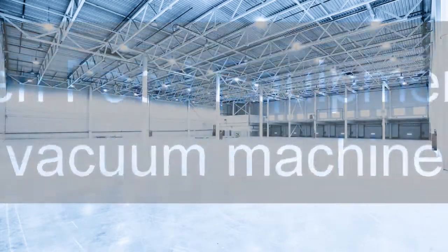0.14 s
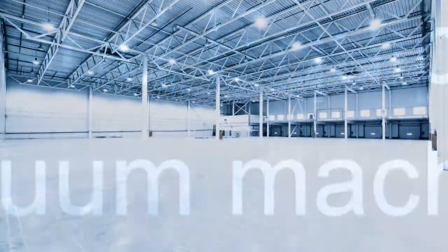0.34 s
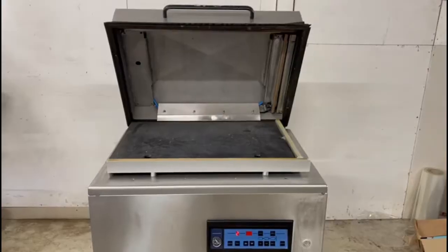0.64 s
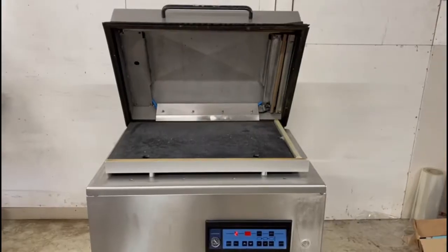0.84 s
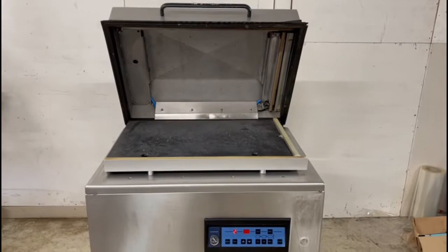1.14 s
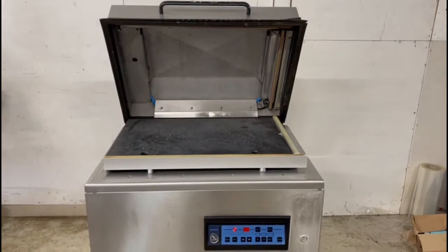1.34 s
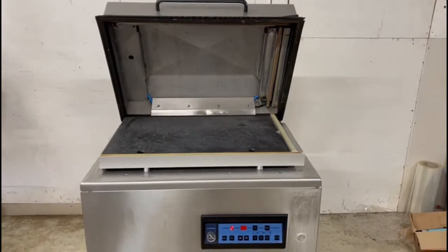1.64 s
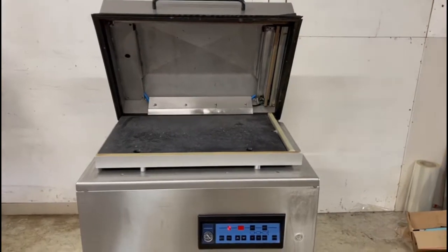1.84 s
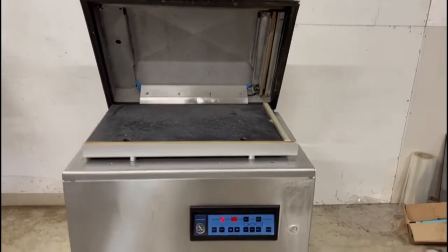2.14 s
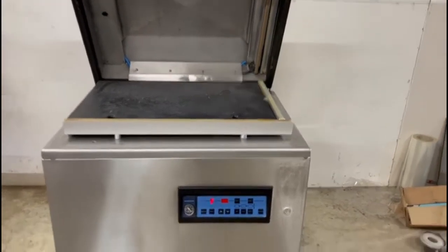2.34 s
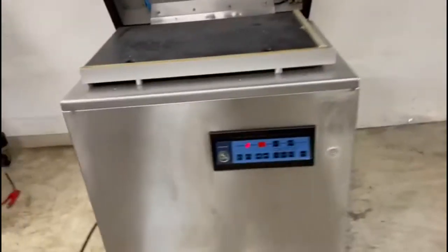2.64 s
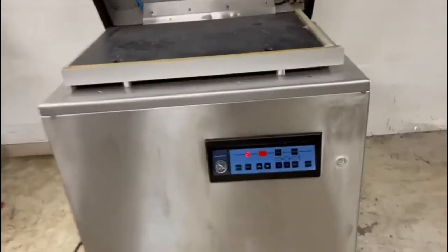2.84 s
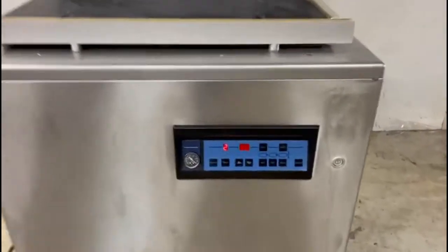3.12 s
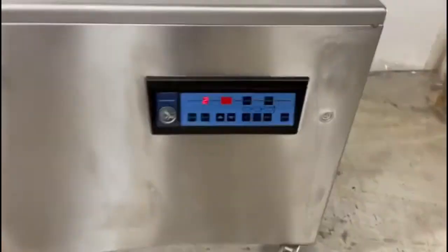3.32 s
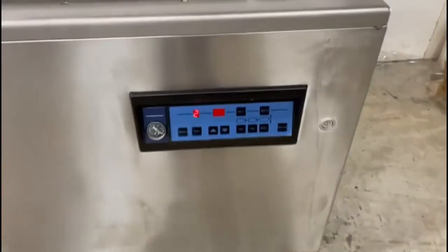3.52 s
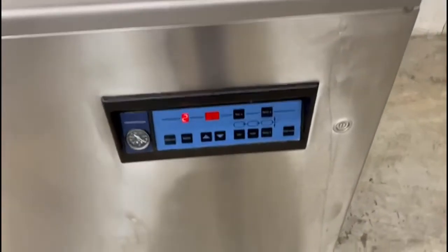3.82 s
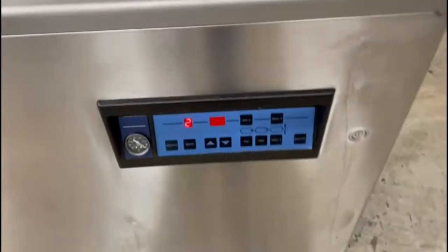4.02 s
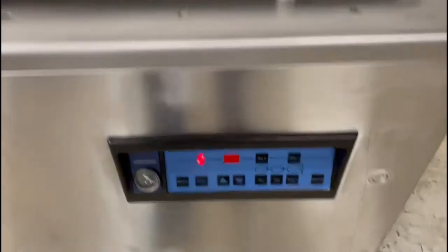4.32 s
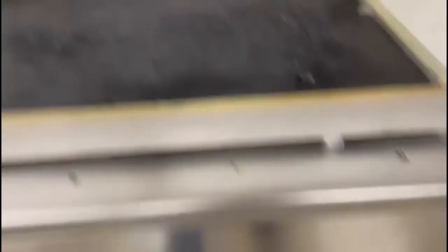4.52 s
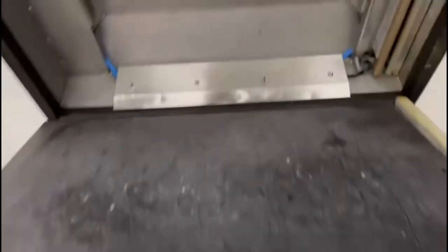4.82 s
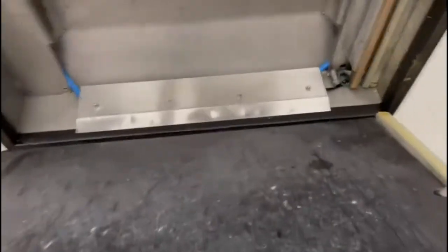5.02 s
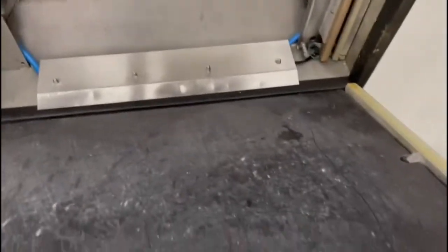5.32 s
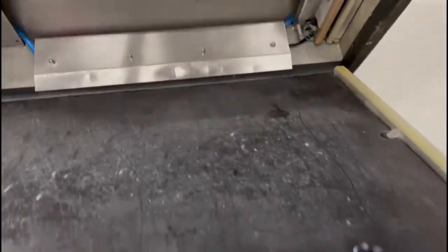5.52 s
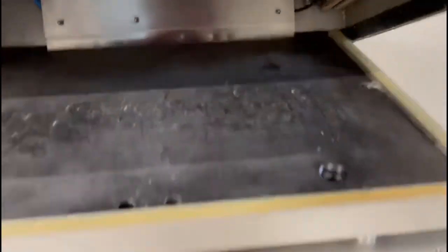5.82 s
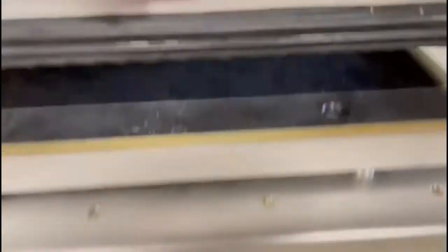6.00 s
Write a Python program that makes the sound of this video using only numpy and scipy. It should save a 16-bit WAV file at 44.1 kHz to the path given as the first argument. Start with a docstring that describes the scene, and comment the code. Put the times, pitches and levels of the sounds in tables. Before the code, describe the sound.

After a moment of silence, a packing machine's vacuum pump is suddenly running, heard from under two metres in a hall with hard walls. Its even mechanical hum carries a wavering whine and an airy rush that rings the steel cabinet. Halfway through, quiet footsteps and scuffs accompany the hand-held microphone as it comes nearer, shifting the hum's tone. A short knock on the lid and some soft thuds come late, over the continuing drone.

```python
"""A three-vane rotary vacuum pump in a packing machine's steel cabinet, in a hard-walled hall.
It cuts in at full speed, 1.75 m from a hand-held microphone pair: the vanes drone, the motor whines,
rushing air rings the cabinet. At 1.7 s the hum slips once. From 3 s soft steps and scuffs go with the
pair up to the front panel, then over the open chamber, 1 m off, and the hum changes colour.
At 5.1 s a hand knocks the lid; the pair then turns back towards the panel."""
import sys
import numpy as np
from scipy import signal
from scipy.fft import rfft, irfft, next_fast_len
from scipy.io import wavfile
from scipy.ndimage import uniform_filter1d, map_coordinates

SR = 44100
rng = np.random.default_rng(int(sys.argv[2]) if len(sys.argv) > 2 else 0)


def wrap_up_sound(samples):
    """Save the sound to the file named by the first command line argument, as 16-bit audio."""
    columns = np.atleast_2d(samples).T
    # keep every value between -1 and 1, then stretch to whole-number steps
    tamed = np.clip(columns, -1, 1)
    steps = np.round(tamed * 32767).astype(np.int16)
    wavfile.write(sys.argv[1], SR, steps)


N = 271611

START_S, TOP_HZ = .4806, 11760
SHAFT_HZ, MOTOR_HZ, BEARING_HZ, MAINS_HZ = 24.0, 24.372, 188.27, 100
SLIP_AT_S, SLIP_S = 1.68, .0184

# Path of the microphones; place 0 is far off, 1 at the front panel, 2 over the chamber:
# (time [s], distance [m], place [0-2], rush gain [dB], hiss gain [dB])
MIC_PATH = [(.5, 1.75, 0.084, 0.04, 0), (1.4, 1.63, 0.09, 0, 0), (2.2, 1.67, 0.65, 0, 0.12),
            (2.7, 1.77, 0.21, 0.55, 0.86), (3.3, 1.34, 1, 0.94, 0.96), (4.0, 0.996, 1.07, 1, 1.56),
            (4.4, 0.99, 0.73, 0.03, 0.68), (4.8, 0.97, 1.7, 0.76, 1.3), (5.4, 1, 1.74, 0.97, 1.05),
            (6.16, 0.92, 1.23, 1, 1.6)]
# Width as heard: (frequency [Hz], side over mid [dB], side in step [ratio], side in quadrature [ratio])
STEREO_IMAGE = [(60, -51, 0, 0), (205, -23, 0, .2), (265, -10, -.1, 0), (340, -12, -.1, 0),
                (457, -8.5, 0.03, .1), (800, -4.5, 0.13, 0.38), (1560, -2, -0.18, 0.1),
                (2310, -6.5, 0.059, .2), (3000, -3.5, 0.36, .3), (3700, -11, .3, .2), (4700, -4, .3, .1),
                (5500, -10, .2, 0), (6350, -15, .1, -.2), (7090, 2.5, .1, -.4), (7465, 10.5, 0, -.3),
                (7900, 50.5, 0, 0), (8800, 31.5, 0, 0), (9240, 11, 0, .3), (9670, 5, 0, .6),
                (10250, -4, 0, .5), (10700, -55, 0, 0)]
# Broad rush of air and sliding vanes: (frequency [Hz], density [dB per Hz])
RUSH_SPECTRUM = [(15, -86), (30, -83), (60, -61.5), (90, -66.5), (125, -73), (250, -72.5), (460, -74),
                 (650, -72.5), (820, -70), (1000, -74), (1300, -73), (1600, -74), (1820, -79),
                 (2150, -78.5), (2500, -81), (2900, -81), (3300, -90), (4600, -89), (5400, -94.5),
                 (7500, -96), (12000, -100)]
# Part of the rush that is alike on every motor turn: (frequency [Hz], share [0-1])
RUSH_REPEATS = [(500, 0.05), (900, 0.44), (1600, 0.25), (2200, 0.52), (2800, 0.03), (3600, 0.05), (5000, 0)]
# Cabinet resonances: (frequency [Hz], width [Hz], far [dB], at panel [dB], over chamber [dB])
CABINET_MODES = [(181, 14.3, -59, -50.5, -62), (327.3, 84, -58.5, -58, -62.5), (417, 26.5, -65, -63, -56),
                 (539.4, 54, -60.5, -62.5, -60.5), (614.5, 26.4, -59, -58, -75), (700, 17, -60, -58, -61.5),
                 (938, 63, -65, -62, -76), (1020, 27, -69.5, -58.5, -72), (1077, 21, -66, -71.5, -58),
                 (1109.6, 17.7, -52.5, -64.5, -54), (1218, 17.4, -62.5, -59, -61),
                 (1328, 32, -68, -65, -73.5), (1495, 89, -71.5, -73, -76.5), (1615, 32, -77, -67, -85),
                 (1950, 91, -76.5, -75.5, -71.5), (2191, 104, -87, -76.5, -70), (2666, 64, -75.5, -79, -80),
                 (3130, 57, -82.5, -76, -96), (3417, 89, -84.5, -85, -89)]
# A reflection off the cabinet's edge, sinking as the pair rises: (time [s], centre [Hz], lift [dB])
EDGE_REFLECTION = [(4.3, 2500, 0), (4.38, 2380, 6), (4.43, 1650, 7), (4.52, 1500, 7), (4.6, 1220, 6.5),
                   (4.74, 1000, 0)]
# Soft steps and bumps: (time [s], level [dB], pitch [Hz], t60 [s])
FOOTSTEPS = [(3.018, -28, 152, 0.16), (3.479, -36, 110, .2), (4.002, -29, 120.4, 0.16),
             (5.364, -26, 151.4, 0.33), (5.479, -23.5, 167.5, 0.21), (5.542, -33, 260.6, 0.5),
             (5.902, -25.5, 320, 0.18), (6.119, -30.5, 130, 0.2)]
# Swells of noise: (time [s], level [dB], length [s], centre [Hz], width [octaves])
SCUFF_SWELLS = [(3.672, -44.5, .055, 3100, .75), (4.27, -49.5, .035, 4200, .55),
                (4.42, -42.5, .5, 952, .03), (5.111, -41, .03, 2500, .85), (5.53, -35.5, .06, 900, .4),
                (5.64, -48, .46, 2030, .018), (6.125, -44, .05, 3000, .8)]
# A hand meets the lid: (time [s], level [dB], hardness [dB per octave])
HAND_CONTACTS = [(5.103, -24, -8), (5.112, -37, 4.5), (5.126, -29, -2)]
# The lid's ring: (frequency [Hz], level [dB], t60 [s])
LID_MODES = [(355, 0, .11), (430, -1, .1), (500, -5, .07), (1077, -7, .06), (1500, -11, .04),
             (2223, -9, .05), (2800, -18, .03), (3451, -16.5, .11), (4161, -22, .03), (4750, -15, .03),
             (6200, -30, .03)]
# A thin tone, perhaps a bearing: (harmonic [number], level [dB])
BEARING_PARTIALS = [(1, -53), (8, -58), (9, -60)]
# Motor whine: (order [per turn, rounded in use], far [dB], at panel [dB], over chamber [dB])
MOTOR_ORDERS = [(38, -56.5, -57, -65.5), (42, -65, -56, -53), (46, -51, -56.5, -50), (49, -55, -59.5, -67),
                (50, -53, -58, -55), (53, -59, -66.5, -52), (60, -61, -59.5, -63), (61, -61.5, -59, -47),
                (79.7, -69.5, -57.5, -67), (87.4, -59, -62.5, -59), (89.2, -58.5, -63.5, -64),
                (91, -61, -62, -61)]
# Lesser rotor tones: (order [per turn, rounded in use], far [dB], at panel [dB], over chamber [dB])
ROTOR_ORDERS = [(6, -52, -51, -43), (9, -41.5, -39.5, -47.5), (16.1, -44, -43, -65),
                (18, -55, -58.5, -43.5), (27, -59, -57, -65), (32, -59, -54.5, -54), (36, -54, -49, -68),
                (39, -55.5, -58.5, -42), (40, -52, -53, -48.5), (42, -54.5, -59.5, -51),
                (45, -67, -52.5, -50)]
# The vane rate and the multiples that change most along the path: (order [per turn])
VANE_ORDERS = [3, 12, 15, 21, 24]
# Their direct sound: (time [s], order 3 [dB], order 12 [dB], order 15 [dB], order 21 [dB], order 24 [dB])
VANE_DIRECT = [(.5, -38, -31.5, -39.5, -62, -43.5), (1.1, -38.5, -30.5, -37, -51, -45.5),
               (1.6, -39, -32, -39.5, -57, -44), (2.3, -38, -31, -41, -47.5, -42.5),
               (2.7, -38, -28.5, -42, -43, -41.5), (2.95, -36.5, -31, -42, -44.5, -46),
               (3.15, -40.5, -33.5, -40, -38.5, -41.5), (3.35, -34.5, -31, -44, -54, -40),
               (3.72, -35, -30.5, -41, -58, -44), (3.9, -36, -29, -45, -62, -62),
               (4.35, -34.5, -28, -35, -51, -66), (4.55, -36.5, -33, -41.5, -50, -45),
               (4.8, -34.5, -44, -41.5, -51, -49), (5.3, -31, -48.5, -52, -48, -42),
               (5.7, -36, -43, -49, -50, -44), (6.15, -30, -36, -35.5, -66, -68)]
# Their return off the walls, a row for each order: (far [dB], at panel [dB], over chamber [dB])
VANE_WALLS = [(-48, -41, -52), (-47, -46, -31), (-51, -52, -42), (-58, -52, -50), (-43, -48, -30)]


def amp(db):
    return 10 ** (np.asarray(db) / 20)


def at_hz(rows, hz):
    """Each column after the frequency, read on a log axis."""
    knots, *cols = np.transpose(rows)
    return [np.interp(np.log(hz + 1), np.log(knots + 1), c) for c in cols]


def at_time(rows, t):
    """Each column after the time, read at the times t."""
    knots, *cols = np.transpose(rows)
    return [np.interp(t, knots, c) for c in cols]


def at_mic(levels_db, t):
    """Far, panel and chamber levels blended for where the microphones are."""
    return np.interp(at_time(MIC_PATH, t)[1], np.arange(3), levels_db)


def wobble(rate, t):
    """A smooth random curve, rate knots a second."""
    grid = np.arange(0, N / SR + .02, .005)
    knots = rng.standard_normal(int(N * rate / SR) + 8)
    return np.interp(t, grid, map_coordinates(knots, [grid * rate]))


def filtered(x, response):
    """x times a complex response of frequency."""
    size = next_fast_len(N + 8192)
    return irfft(rfft(x, size) * response(np.fft.rfftfreq(size, 1 / SR)), size)[..., :N]


def add(track, start_s, sound):
    part = track[..., round(start_s * SR):][..., :sound.shape[-1]]
    part += sound[..., :part.shape[-1]]


def stereo_gains(hz):
    """Mid and side gains: the hiss is in opposite phase left and right near 8 kHz, mono above 10.7 kHz."""
    side_db, in_step, quadrature = at_hz(STEREO_IMAGE, hz)
    angle = np.arctan(amp(side_db))
    tied = in_step + 1j * quadrature
    loose = np.sqrt(np.clip(1 - abs(tied) ** 2, 0, 1))
    return np.array([np.cos(angle), np.sin(angle) * tied, np.sin(angle) * loose])


def pump_time(t):
    """When the sound heard at t left the pump: travel time to the microphones, and the slip."""
    return t - at_time(MIC_PATH, t)[0] / 343 - SLIP_S * (t > SLIP_AT_S)


def tone(hz, db, t, waver_db, drift_rad, order=None, wall_db=None):
    """A partial in two rows: heard direct and, at another phase, off the walls."""
    offsets = rng.uniform(0, 2 * np.pi, (2, 1))
    if order is not None:  # vane strokes are drawn out: high orders fall out of step and throb little
        offsets[0] = -.095 * order ** 2
    phase = 2 * np.pi * hz * pump_time(t) + drift_rad * wobble(5, t) + offsets
    direct_db = db + waver_db * wobble(6, t)
    scattered_db = (db if wall_db is None else wall_db) + waver_db * wobble(4.08, t)
    return np.sqrt(2) * amp([direct_db, scattered_db]) * np.sin(phase)


def motor_scrape(t):
    """Noise that repeats with every motor turn; three patterns slowly trade places."""
    size = round(SR / MOTOR_HZ)
    angle = (pump_time(t) * MOTOR_HZ % 1 * size).astype(int)
    patterns = rng.standard_normal((3, 2, size))
    weights = np.array([wobble(1.595, t) for _ in patterns])
    weights /= np.sqrt((weights ** 2).sum(axis=0) + .058)
    return sum(w * p[:, angle] for w, p in zip(weights, patterns))


def air_rush(t):
    """Air noise through cabinet resonances that each swell by themselves; each turn of the rotor chops it
    slightly."""
    hz, frames, fresh = signal.stft(rng.standard_normal((2, N)), SR, nperseg=2048)
    hz = hz[:, None]
    scrape = signal.stft(motor_scrape(t), SR, nperseg=2048)[2]
    share = at_hz(RUSH_REPEATS, hz)[0]
    source = np.sqrt(1 - share) * fresh + np.sqrt(share) * scrape
    power = amp(at_hz(RUSH_SPECTRUM, hz)[0]) ** 2
    for centre, width, *levels in CABINET_MODES:
        swell = amp(at_mic(levels, frames) + 1.1 * wobble(3, frames))
        power = power + (swell / (1 + (2 * (hz - centre) / width) ** 2)) ** 2
    _, _, rush_db, hiss_db = at_time(MIC_PATH, frames)
    treble = np.clip(np.log2(hz / 1500 + 1e-9) / 1.05, 0, 2)  # moving in close lifts the treble most
    flicker = uniform_filter1d(uniform_filter1d(rng.standard_normal(power.shape), 8, 0), 5, 1)
    gain_db = rush_db * np.clip(1 - treble, 0, 1) + hiss_db * treble + 2.1 * flicker / flicker.std()
    edge_hz, lift_db = at_time(EDGE_REFLECTION, frames)
    gain_db += lift_db * np.exp(-(np.log2((hz + 1) / edge_hz) / .21) ** 2)
    noise = signal.istft(source * np.sqrt(power * SR / 2) * amp(gain_db), SR, nperseg=2048)[1][:, :N]
    body = filtered(noise, lambda hz: 1 / (1 + (hz / 2500) ** 4))
    turn = 2 * np.pi * SHAFT_HZ * pump_time(t)
    chop = .063 * np.sin(turn) + .031 * np.sin(2 * turn) + .023 * np.sin(4 * turn)
    return noise + body * chop


def footsteps(track, t):
    """Adds dull thuds, each three close, damped modes."""
    for start, db, hz, t60 in FOOTSTEPS:
        modes_hz = hz * np.array([[.82], [1], [1.2]])
        phase = 2 * np.pi * modes_hz * t + rng.uniform(0, 2 * np.pi, (2, 3, 1))
        thud = (amp([[-6], [0], [-5]]) * np.sin(phase)).sum(axis=1)
        add(track, start, amp(db - 60 * t / t60) * (1 - np.exp(-t / .0064)) * thud)


def scuffs(track, t):
    """Adds swells of noise: broad ones are cloth or sole rubbing, narrow ones a passing ring."""
    hz = np.fft.rfftfreq(len(t), 1 / SR) + 1
    for start, db, length, centre, octaves in SCUFF_SWELLS:
        band = np.exp(-.5 * (np.log2(hz / centre) / octaves) ** 2)
        grit = irfft(rfft(rng.standard_normal((2, len(t)))) * band, len(t))
        add(track, start, amp(db) * np.sin(np.pi * np.clip(t / length, 0, 1)) * grit / grit.std())


def lid_knock(track, t):
    """Adds the lid ringing under a hand; neighbouring modes start in opposite senses."""
    for start, db, hardness in HAND_CONTACTS:
        ring = 0
        for k, (hz, level, t60) in enumerate(LID_MODES):
            mode_db = level + hardness * np.log2(hz / LID_MODES[0][0]) + rng.normal(0, 1, (2, 1))
            ring += (-1) ** k * amp(mode_db - 60 * t / t60) * np.sin(2 * np.pi * hz * t)
        add(track, start, amp(db) * (1 - np.exp(-t / .0018)) * ring)


def motor_whine(t):
    """High orders of the motor, a little faster than the rotor, with faint bearing and mains tones."""
    whine = sum(tone(round(k) * MOTOR_HZ, at_mic(levels, t), t, waver_db=3.3, drift_rad=.62)
                for k, *levels in MOTOR_ORDERS)
    bearing = sum(tone(k * BEARING_HZ, db, t, waver_db=4.2, drift_rad=.7) for k, db in BEARING_PARTIALS)
    return whine + bearing + tone(MAINS_HZ, -59, t, waver_db=2.4, drift_rad=.27)


def rotor_hum(t):
    """Lesser vane multiples and the rotor's every eighth order; the higher, the less steady."""
    hum = 0
    for k, *levels in ROTOR_ORDERS:
        k = round(k)
        unsteady = np.sqrt(k / VANE_ORDERS[0])
        hum += tone(k * SHAFT_HZ, at_mic(levels, t), t,
                    waver_db=.71 * unsteady, drift_rad=.024 * unsteady, order=k)
    return hum


def vane_drone(t):
    """Three vane strokes a turn sound multiples of three times the shaft rate; the walls return them."""
    return sum(tone(k * SHAFT_HZ, db, t, waver_db=.48, drift_rad=.074, order=k, wall_db=at_mic(walls, t))
               for k, db, walls in zip(VANE_ORDERS, at_time(VANE_DIRECT, t), VANE_WALLS))


def scene():
    """Direct and scattered sound are spread into mid and side, giving left and right."""
    t = np.arange(N) / SR
    dip = np.clip(abs(t - SLIP_AT_S) / .003, 0, 1)  # the tones dip as they slip
    hall = dip * (vane_drone(t) + rotor_hum(t) + motor_whine(t)) + air_rush(t)
    for movement in (footsteps, scuffs, lid_knock):
        movement(hall, t[:SR // 2])  # half a second for each event
    direct, scattered = hall
    mid, tied, loose = filtered(np.array([direct, direct, scattered]), stereo_gains)
    return np.array([mid + tied + loose, mid - tied - loose])


def record(dry):
    """The sound cuts in from silence; nothing is kept above the band limit."""
    gate = np.clip((np.arange(N) / SR - START_S) / .0005, 0, 1)
    return filtered(dry * gate, lambda hz: np.clip((TOP_HZ + 150 - hz) / 300, 0, 1) ** 2)


dry = scene()
out = record(dry)
wrap_up_sound(out)
```